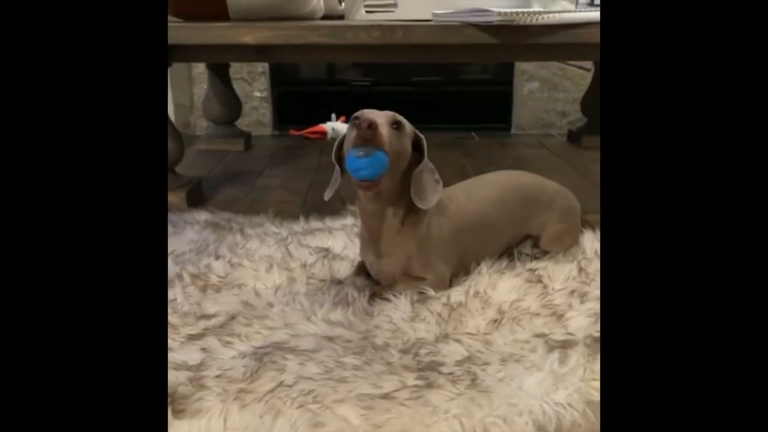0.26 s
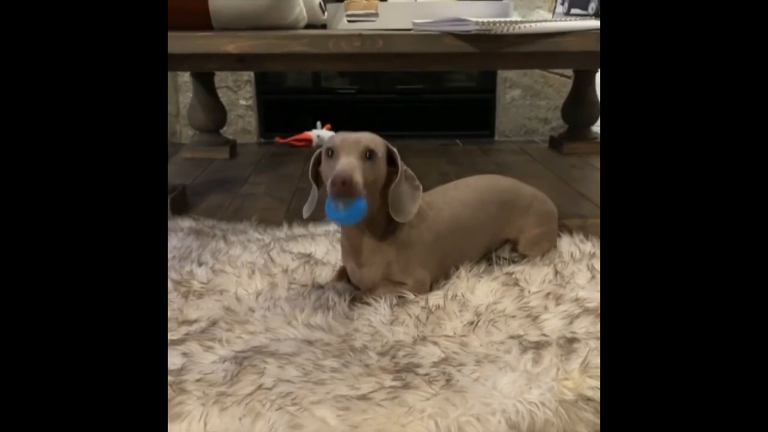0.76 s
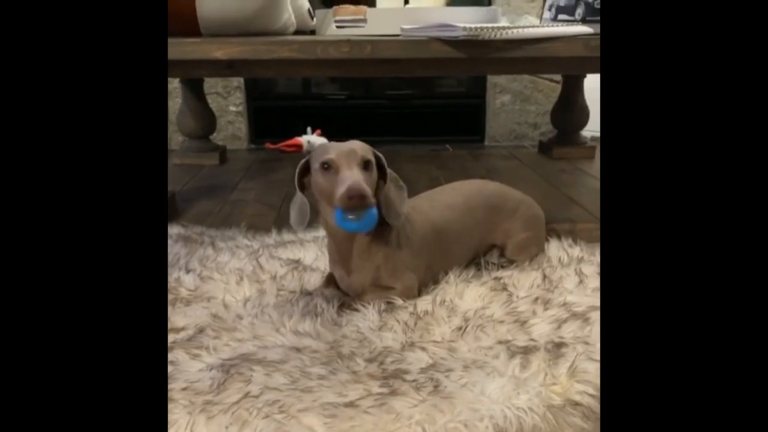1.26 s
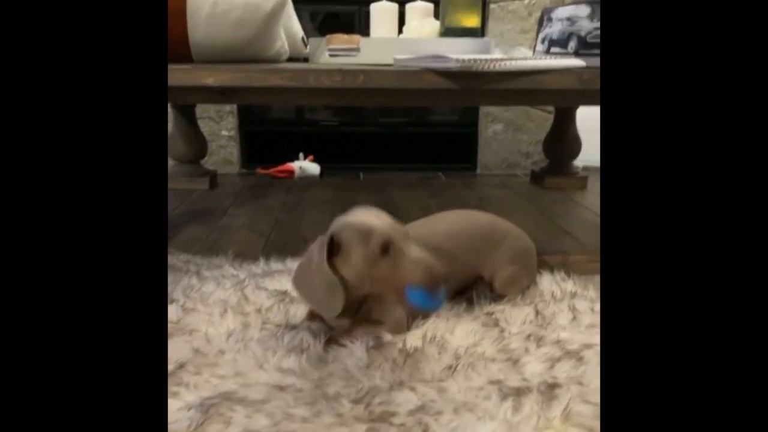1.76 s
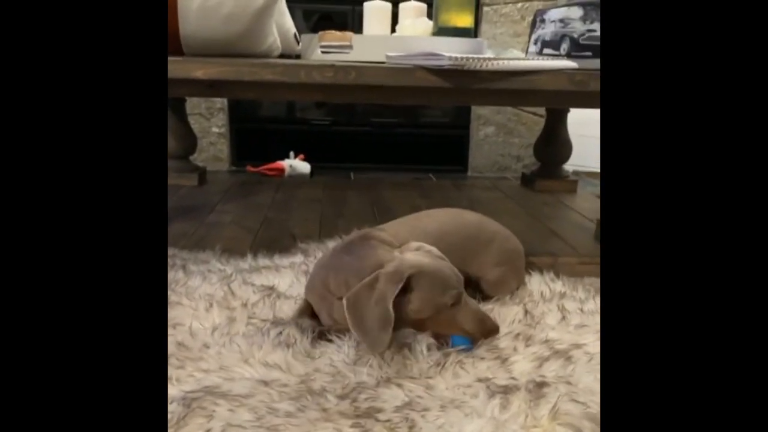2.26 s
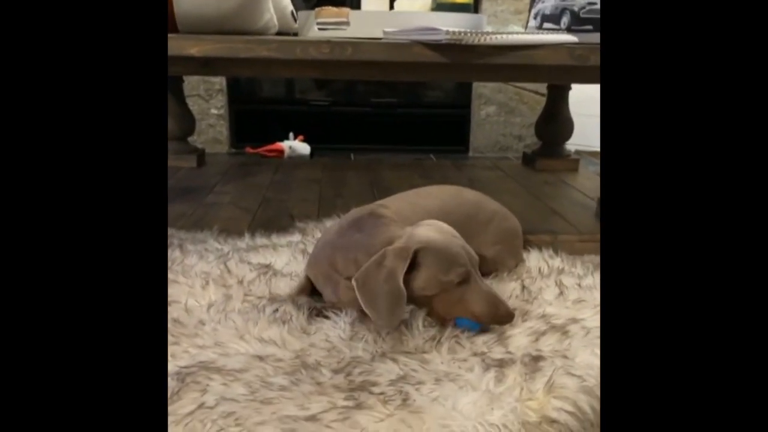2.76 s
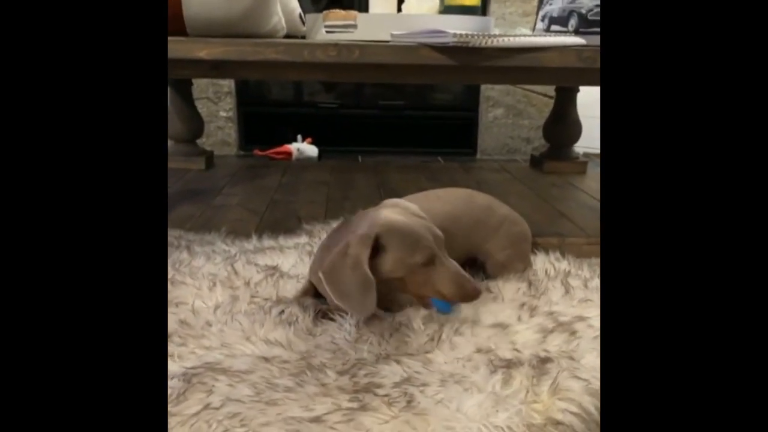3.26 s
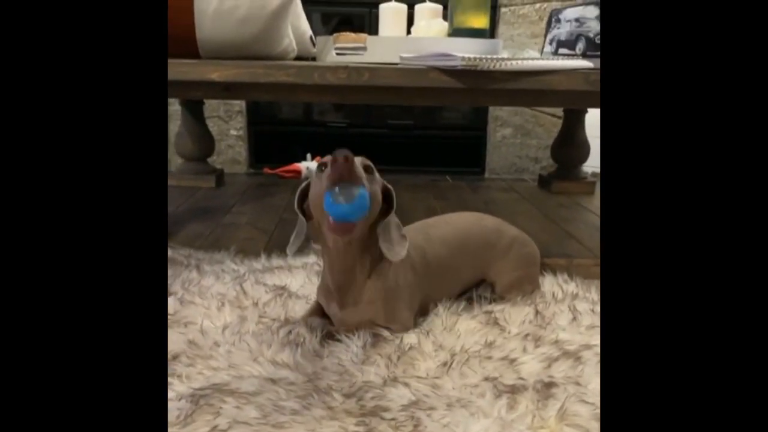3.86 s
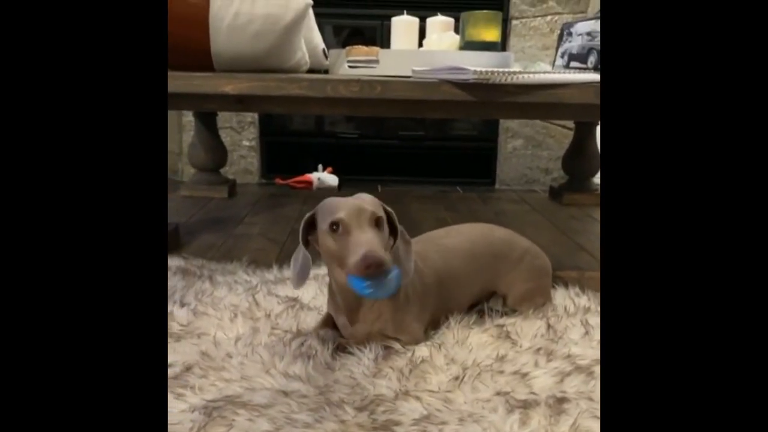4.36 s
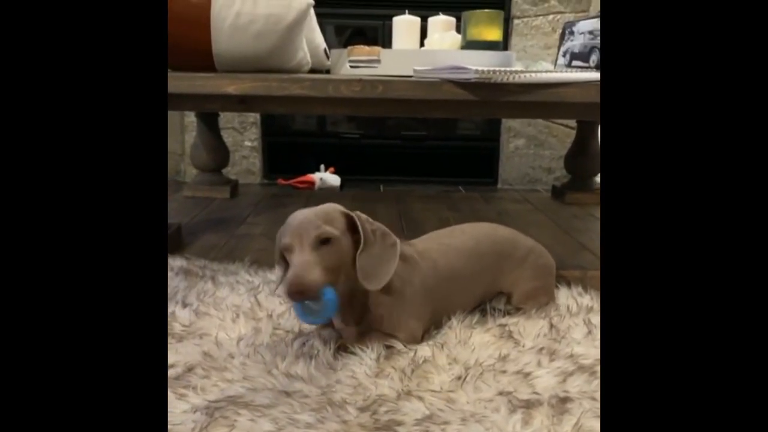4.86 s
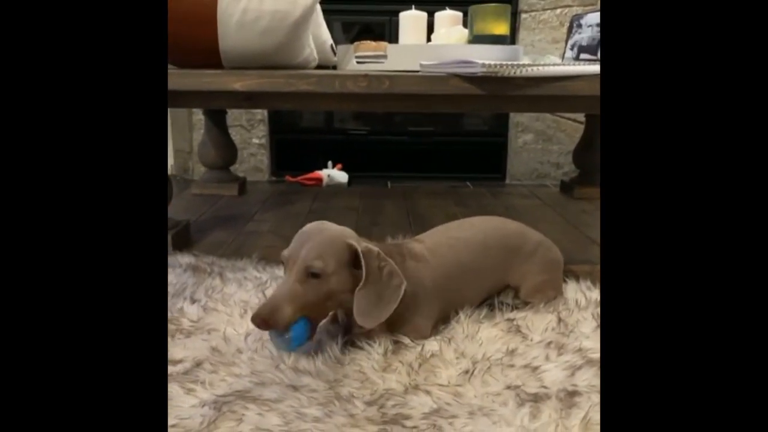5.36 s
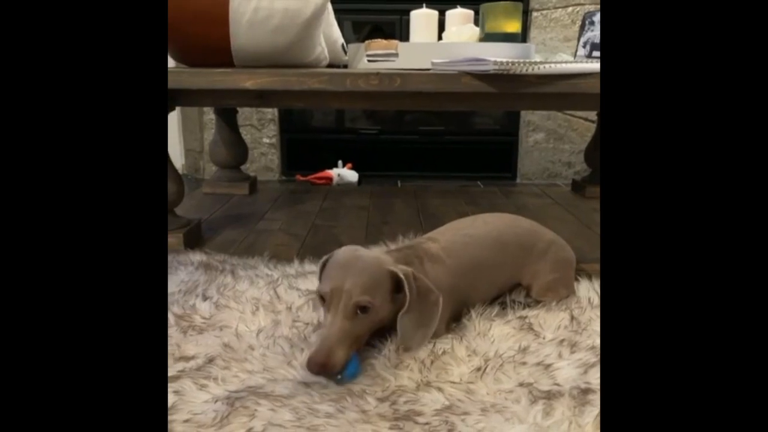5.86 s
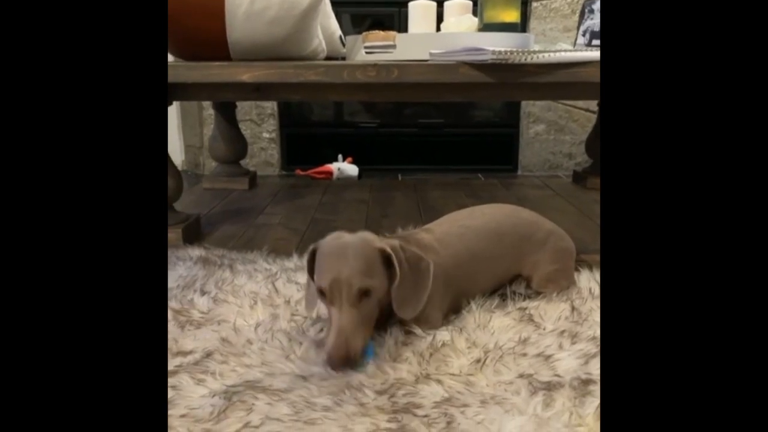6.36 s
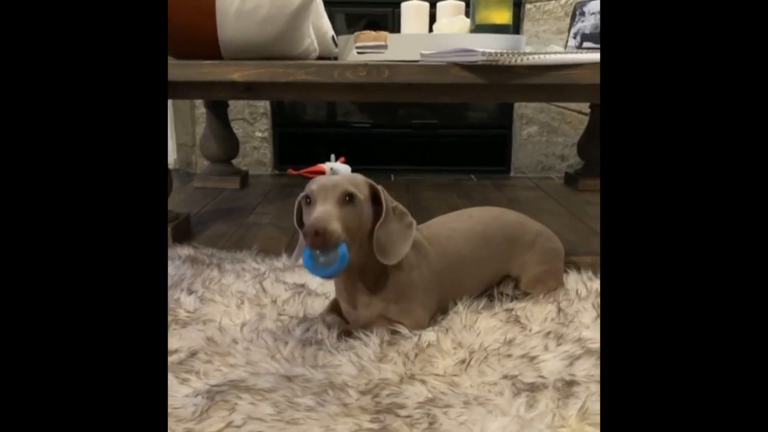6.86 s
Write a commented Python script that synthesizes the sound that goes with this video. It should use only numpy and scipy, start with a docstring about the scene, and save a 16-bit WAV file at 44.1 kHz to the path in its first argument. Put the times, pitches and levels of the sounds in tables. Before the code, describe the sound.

High squeaks from a rubber toy repeat in quick pairs as a dog bites down and lets go. The pitch bends and jumps, with a little rushing air, and each pair trails off lower. The chewing stops briefly halfway, with a few faint ticks of teeth on rubber, then resumes louder and sharper. The microphone is nearby in a quiet living room with a short echo and a soft background rumble.

```python
"""A living room, where a small dog lies on a rug and chews a rubber squeaky toy. Each bite first leaks air,
then drives the toy's reed; the release sucks air back through it as a second squeak. The reed's pitch follows
the air pressure and jumps between registers. A brief grainy rustle with a click opens the scene, teeth tick on
rubber, and the room rings briefly over a low background rumble."""
import sys
import numpy as np
from scipy import signal
from scipy.fft import rfft, irfft, next_fast_len
from scipy.io import wavfile
from scipy.ndimage import uniform_filter1d, map_coordinates

SR = 44100
rng = np.random.default_rng(int(sys.argv[2]) if len(sys.argv) > 2 else 0)


def log_audio(samples):
    """Write samples as a 16-bit WAV file to the path given in sys.argv[1]."""
    # one column per channel
    frames = np.atleast_2d(samples).T
    # limit to full scale, then quantise
    limited = np.clip(frames, -1, 1)
    pcm = np.round(limited * 32767).astype(np.int16)
    wavfile.write(sys.argv[1], SR, pcm)


N = 313551

# one row per bite: leak_start_s, leak_db, fall_per_overtone_db, flutter_depth
BITES = [(.302, -71, 0, 0.0057), (.938, -74.5, -0.5, 0.0084), (1.582, -72.5, 0, 0.014),
         (2.188, -68, 1, 0.012), (2.858, -80.5, 1, 0.02), (4.138, -65.5, 2.5, 0.0099),
         (4.876, -57, -3.5, 0.013), (5.508, -55, -2.5, 0.016), (6.119, -65.5, 1.4, 0.0067),
         (6.84, -60, -1.25, 0.0088)]
# the reed's path under each bite, a list of points: time_s, pitch_hz, level_db
BITE_PATHS = [
    [(.395, 2440, -33), (.414, 2136, -34), (.422, 1730, -32), (.453, 1478, -33.5), (.51, 1554, -33),
     (.53, 1693, -31), (.548, 1441, -33.5), (.574, 1298, -51)],
    [(.999, 1834, -37.5), (1.006, 1520, -28.5), (1.024, 1661, -26), (1.092, 1433, -30), (1.152, 1817, -24),
     (1.157, 2333, -25.5), (1.17, 1966, -30.5), (1.188, 1340, -35)],
    [(1.631, 1652, -36), (1.648, 1609, -31), (1.694, 1401, -34.5), (1.728, 1380, -41.5)],
    [(2.3, 1840, -33.5), (2.321, 1930, -32.5), (2.356, 1780, -41.5)],
    [(2.952, 2916, -32.5), (2.97, 2816, -33), (2.984, 2844, -29), (2.985, 2605, -32), (3.01, 2634, -34.5),
     (3.033, 2530, -27.5), (3.05, 2660, -29), (3.07, 2768, -38.5), (3.099, 2620, -43)],
    [(4.259, 2507, -27.5), (4.284, 2652, -26), (4.312, 3446, -15), (4.313, 4440, -17.5), (4.331, 5316, -28),
     (4.35, 5385, -21.5), (4.371, 4250, -22), (4.372, 2678, -21), (4.39, 2048, -33), (4.399, 1447, -46)],
    [(4.988, 2662, -21.5), (5.018, 2680, -26), (5.03, 3050, -17), (5.041, 3410, -18), (5.042, 4600, -17),
     (5.056, 5594, -20.5), (5.066, 5670, -17.5), (5.082, 5310, -29.5), (5.095, 4120, -28),
     (5.096, 2470, -30), (5.108, 1745, -34.5)],
    [(5.597, 2844, -24), (5.604, 2800, -19.5), (5.613, 2477, -18.5), (5.635, 2716, -21),
     (5.65, 2891, -17.5), (5.676, 2924, -19), (5.695, 2273, -25), (5.713, 1450, -34.5)],
    [(6.22, 2475, -31.5), (6.235, 2465, -27.5), (6.259, 1937, -28.5), (6.295, 1440, -29.5),
     (6.336, 1801, -27.5), (6.345, 2238, -22.5), (6.369, 1360, -38)],
    [(6.967, 2326, -25), (6.989, 2205, -25), (7.003, 1698, -26.5), (7.032, 1343, -32), (7.045, 1413, -28),
     (7.06, 1612, -20.5), (7.076, 1454, -31.5), (7.087, 1503, -48)],
]
# colour of the toy's escaping air: frequency_hz, level_db
AIR_COLOUR = [(880, -26.5), (1500, -13), (2440, -10), (4520, -0.5), (7140, -14.5), (8940, -3.5),
              (14000, -15)]
TREBLE_HZ, TOP_HZ = 7130, 14100  # the jaws shade the band between these
SLIP_S, STOP_S, FADE_S = .0027, .0013, .028  # ramps: a pitch slip, a cut-off, a soft fade


def reed():
    """The toy's reed: air pressure bends its pitch, and it falters at each jump of register."""
    # a high note slips briefly in pitch or level: start_s, end_s, pitch_ratio, change_db
    slips = [(.701, .72, 0.92, 9), (0.729, .746, 1, -9.5), (1.32, 1.363, .89, 4.5),
             (5.861, 5.883, .81, 4.5)]
    t = np.arange(N) / SR
    paths, attacks, fall_db, flutter = zip(*squeaks())
    times, hz, db = np.concatenate(paths).T
    which = np.maximum(np.searchsorted([path[0][0] for path in paths], t) - 1, 0)  # current squeak
    note_hz = np.exp(np.interp(t, times, np.log(hz)))
    level_db = np.interp(t, times, db)
    for start, end, ratio, change_db in slips:
        slipping = window(start - SLIP_S / 2, end + SLIP_S / 2, SLIP_S, SLIP_S)
        note_hz *= ratio ** slipping
        level_db += change_db * slipping
    for jump_s in times[1:][np.diff(times) < .002]:  # points this close are a jump of register
        level_db -= 17.5 * np.exp(-((t - jump_s) / .0011) ** 2)
    gate = sum(window(path[0][0], path[-1][0], rise, STOP_S) for path, rise in zip(paths, attacks))
    # fast turns of pressure, and so of pitch, shake the reed and let air rush past
    bend_rate = np.abs(np.gradient(np.log(note_hz))) * SR
    glide = uniform_filter1d(np.minimum(bend_rate, 25), size=SR // 50)
    shake = np.array(flutter)[which] * (.6 + .054 * glide)
    pitch_hz = note_hz * (1 + shake * (.296 * wobble(150) + .84 * wobble(600)))
    # treble that gets past the jaws, per chew: bite_db, release_db
    jaw_treble = [(-1.5, -2), (-2, -2), (-7, 2), (-5, -1), (-2, 5.5), (2, 1), (-6.5, 4), (-4.5, 6), (5, 4),
                  (-3, 2.5)]
    treble_db = np.ravel(jaw_treble)[which]
    tone = shell_tone(note_hz, pitch_hz, np.array(fall_db)[which], treble_db)
    return amp(level_db) * gate * (tone + rasp(note_hz, glide, which, treble_db))


def squeaks():
    """Bites snap the reed open, releases draw it in gently: (path, attack_s, fall_db, flutter) each."""
    # one row per release: catch_s, dropped_s, stop_s, low_db, last_hz, fall_per_overtone_db, flutter_depth
    releases = [(0.593, .851, 0.89, -39, 1071, 3.2, 0.0092), (1.207, 1.468, 1.521, -43, 1029, 4.9, .014),
                (1.743, 1.839, 1.874, -41, 1099, 3.07, 0.021), (2.364, 2.548, 2.62, -47, 1077, 5, .02),
                (3.147, 3.271, 3.334, -36, 1090, 3.26, 0.016), (4.413, 4.558, 4.649, -33, 1080, 2.6, 0.012),
                (5.12, 5.306, 5.326, -40, 1072, 2.76, 0.01), (5.726, 5.939, 5.947, -35, 1020, 4.3, .016),
                (6.389, 6.523, 6.578, -30.5, 1101, 1.59, .012), (7.088, 7.16, 7.22, -33, 1095, 2.64, .015)]
    # the reed's path as the toy refills, from catch to drop: time_s, pitch_hz, level_db
    refill_paths = [
        [(.602, 2545, -32.5), (.619, 2598, -29.5), (.62, 2950, -21), (.63, 3410, -24.5), (.636, 4366, -31),
         (.685, 4220, -35.5), (.704, 4136, -47.5), (.745, 4115, -36.5), (.766, 4450, -26.5), (.773, 4800, -46),
         (.79, 4455, -32), (.809, 4055, -35), (.812, 3446, -26.5)],
        [(1.215, 2530, -32), (1.226, 2574, -27.5), (1.227, 2950, -22.5), (1.242, 3380, -23), (1.249, 4400, -27),
         (1.29, 4290, -33), (1.316, 4045, -32.5), (1.362, 4107, -36), (1.378, 4450, -33.5),
         (1.393, 4760, -46.5), (1.424, 4024, -24)],
        [(1.745, 1266, -39), (1.785, 1417, -39), (1.797, 1730, -35.5), (1.804, 2437, -30.5),
         (1.815, 2460, -33.5), (1.829, 1590, -37.5)],
        [(2.374, 1553, -38.5), (2.384, 2444, -30), (2.397, 2700, -35.5), (2.446, 2837, -34),
         (2.455, 3420, -27.5), (2.471, 4985, -40.5), (2.487, 4885, -36.5), (2.51, 3830, -30),
         (2.536, 1576, -36.5)],
        [(3.15, 1760, -33.5), (3.161, 2140, -33), (3.185, 2390, -29.5), (3.199, 1815, -34),
         (3.214, 1560, -35.5), (3.256, 1638, -35.5)],
        [(4.425, 2647, -29.5), (4.445, 2390, -26.5), (4.47, 2690, -27), (4.499, 2606, -29),
         (4.517, 2145, -28.5), (4.531, 1666, -28)],
        [(5.127, 2346, -30), (5.152, 2440, -33.5), (5.162, 2742, -32), (5.203, 2707, -32.5), (5.229, 2142, -31),
         (5.238, 1620, -33.5), (5.257, 1342, -37.5), (5.276, 1250, -38), (5.291, 1457, -33.5)],
        [(5.739, 2372, -30), (5.766, 2477, -29.5), (5.775, 2730, -28.5), (5.79, 3205, -25),
         (5.798, 4132, -27.5), (5.83, 4210, -24), (5.858, 3960, -29.5), (5.887, 4148, -27), (5.902, 4025, -33),
         (5.906, 3153, -27.5), (5.928, 1550, -33)],
        [(6.394, 1493, -27), (6.399, 2308, -25), (6.409, 2385, -24.5), (6.41, 2787, -31), (6.422, 2582, -27),
         (6.44, 2747, -26.5), (6.464, 2798, -31), (6.488, 2010, -25.5), (6.492, 1628, -31.5)],
        [(7.096, 1262, -29.5), (7.102, 1653, -24), (7.111, 2405, -22.5)],
    ]
    snap_s, draw_s = .0007, .0016
    catch_hz, dropped_hz = 1354, 1248  # a release starts low and drops back low
    sag_hz_per_s, sag_db_per_s = 590, 48.5  # its ending sinks and weakens
    out = []
    for bite, bite_path, release, refill in zip(BITES, BITE_PATHS, releases, refill_paths):
        catch_s, dropped_s, stop_s, low_db, last_hz, *timbre = release
        fading_s = max(stop_s - FADE_S, dropped_s + SLIP_S)
        sagged_hz = dropped_hz - sag_hz_per_s * (fading_s - dropped_s)
        sagged_db = low_db - sag_db_per_s * (stop_s - dropped_s)
        release_path = [(catch_s, catch_hz, refill[0][2]), *refill, (dropped_s, dropped_hz, low_db),
                        (fading_s, sagged_hz, sagged_db), (stop_s, last_hz, sagged_db - 7.5)]
        out += [(bite_path, snap_s, *bite[2:]), (release_path, draw_s, *timbre)]
    return out


def shell_tone(note_hz, pitch_hz, fall_db, treble_db):
    """The reed's flickering overtones, coloured by the toy's pipe and rubber shell."""
    # resonance of pipe and shell: frequency_hz, gain_db
    shell = [(900, -10), (1300, -3), (2500, 1.5), (3600, 7.5), (4500, 7), (5700, -2.5), (6800, -9),
             (8500, -8), (10500, -6), (12000, -30), (14000, -13.5)]
    # the reed skips every other beat, adding half-pitch partials: start_s, end_s, level_db
    skips = [(0.603, 0.617, 1), (1.216, 1.227, 0.5), (4.432, 4.468, -7), (5.152, 5.186, -9),
             (5.717, 5.774, -11), (6.4, 6.419, -6)]
    skipping = sum(amp(db) * window(start, end, .004, .0031) for start, end, db in skips)
    phase = 2 * np.pi * np.cumsum(pitch_hz) / SR
    tone, power = np.zeros(N), np.zeros(N)
    for k in np.arange(2, 25) / 2:
        hz = k * note_hz
        tilt_db = fall_db * min(k, 4.46)  # the tilt levels off for high overtones
        gain = amp(along(shell, hz) - tilt_db + treble_db * (hz > TREBLE_HZ))
        gain *= np.clip((TOP_HZ - hz) / 500 + 1, 0, 1)
        if k in (1, 2, 3):  # these harmonics set the loudness
            power += gain ** 2 / 2
        if k % 1:
            gain *= skipping
        tone += gain * amp(2.57 * wobble(90)) * np.sin(k * phase)
    return tone / np.sqrt(power)


def rasp(note_hz, glide, which, treble_db):
    """Turbulent air rushes past the reed: rough on glides, purer on held notes."""
    # base level of the air against the tone, per chew: bite_db, release_db
    breathiness = [(-24.5, -30.5), (-27, -32), (-14, -26.5), (-20, -26.5), (-42, -26.5), (-37, -22.5),
                   (-31.5, -30), (-29, -31), (-25, -26), (-22.5, -28.5)]
    top_register = note_hz > 3716  # whistles with less air
    level = amp(np.ravel(breathiness)[which] - 9 * top_register + 1.5 * wobble(60))
    rush = hiss(AIR_COLOUR)
    bright = filtered(rush, lambda hz: hz > TREBLE_HZ)
    body = (1 + .23 * glide) * (rush - bright)
    sizzle = (1 + .12 * glide) * amp(treble_db + 5) * bright
    return level * (body + sizzle)


def second_note():
    """For moments, the reed's other note sounds along with its high whistle."""
    # start_s, end_s, pitch_hz, level_db
    notes = [(0.692, .748, 4100, -44.5), (0.763, 0.792, 3730, -45.5), (1.351, 1.424, 3603, -47),
             (4.315, 4.32, 3444, -24), (5.038, 5.043, 3410, -27)]
    t = np.arange(N) / SR
    tone = sum(amp(db) * window(start, end, SLIP_S, SLIP_S) * np.sin(2 * np.pi * hz * t)
               for start, end, hz, db in notes)
    return np.sqrt(2) * amp(1.5 * wobble(120)) * tone


def leaks():
    """The jaw squeezes air out before the reed starts."""
    level = sum(amp(db) * window(start, path[0][0], .07, .008)
                for (start, db, *_), path in zip(BITES, BITE_PATHS))
    return level * hiss(AIR_COLOUR)


def teeth():
    """Tiny noise bursts, each around its own pitch: a click inside the opening rustle, then teeth and tongue
    ticking on rubber."""
    # start_s, relative_db, centre_hz
    ticks = [(0.162, -42, 6340), (3.699, -50, 9800), (3.7365, -47.5, 4340), (3.925, -45.5, 3840)]
    out, t = np.zeros(N + SR), np.arange(SR // 50) / SR
    for start, db, hz in ticks:
        body = uniform_filter1d(rng.standard_normal(len(t)), size=8) * np.sin(2 * np.pi * hz * t)
        click = np.diff(rng.standard_normal(len(t) + 1))
        decay = amp(db + 4.5 - 60 * t / .0088)
        out[round(start * SR):][:len(t)] += decay * (1.3 * body + .18 * click)
    return out[:N]


def room(x):
    """Floor and furniture answer fast; each squeak then rings with its own random echo tail."""
    # decay of the diffuse tail: frequency_hz, t60_s
    ring_times = [(1000, 0.53), (2600, 0.4), (7000, 0.29), (13000, 0.23)]
    # colour of the echoes: frequency_hz, gain_db
    colour = [(1200, -3), (3700, 0.5), (6000, -4.5), (13000, -3)]
    # echoes against the direct sound, per chew: level_db
    sends = [-8.5, -7, -4.5, -3.5, -4, -6.5, -7.5, -8.5, -6, -6.5]
    edges = [0, *(round(path[0][0] * SR) for path, *_ in squeaks()[1:]), N]
    out = np.zeros(N + SR)
    for start, end, send_db in zip(edges, edges[1:], np.repeat(sends, 2)):
        hz, t, noise = signal.stft(rng.standard_normal(SR // 2), SR, nperseg=256)
        early = amp(5 - 60 * t / .11)
        diffuse = amp(-60 * t / along(ring_times, hz)[:, None])
        tail = signal.istft(noise * (early + diffuse) * amp(along(colour, hz))[:, None], SR, nperseg=256)[1]
        delayed = np.pad(x[start:end], (180, 0))
        echo = signal.fftconvolve(delayed, tail / np.linalg.norm(tail))
        out[start:start + len(echo)] += amp(send_db) * echo
    return out[:N]


def rustle():
    """A brief grainy rustle at the very start."""
    # swell of the rustle: time_s, relative_db
    swell = [(0.07, -75), (0.08, -55.5), (0.19, -78)]
    # its colour: frequency_hz, level_db
    fibres = [(59, -33), (100, 5), (462, -26), (933, -23.5), (2130, -15.5), (14000, -41.5)]
    times, db = np.transpose(swell)
    grain = amp(np.interp(np.arange(N) / SR, times, db) + 7.5 + 1.9 * wobble(142))
    return grain * window(times[0], times[-1], .0035, .013) * hiss(fibres)


def faint_whistle():
    """A thin, very high sine glides upward after one release."""
    # time_s, pitch_hz
    rise = [(3.46, 12000), (3.53, 12600), (3.63, 13900)]
    times, hz = np.transpose(rise)
    phase = 2 * np.pi * np.cumsum(np.interp(np.arange(N) / SR, times, hz)) / SR
    return amp(-83 + 2 * wobble(60)) * window(times[0], times[-1], FADE_S, STOP_S) * np.sin(phase)


def rumble():
    """Low background rumble that slowly swells, then ducks at the loudest squeaks."""
    # envelope of the rumble: time_s, level_db
    envelope = [(0, -61), (.2, -66.5), (.6, -59.5), (3.599, -52.5), (5, -50.5), (5.051, -57.5),
                (5.598, -56), (7.11, -53.5)]
    # its colour: frequency_hz, level_db
    colour = [(25, -12.5), (65, -0.5), (107, -0.5), (335, -16), (802, -21), (1260, -27), (2310, -38),
              (3530, -37.5), (14000, -58.5)]
    times, db = np.transpose(envelope)
    return amp(np.interp(np.arange(N) / SR, times, db) + 1.4 * wobble(2.5)) * hiss(colour)


def amp(db):
    """Decibels to gain."""
    return 10 ** (np.asarray(db) / 20)


def along(points, hz):
    """(frequency_hz, value) points read on a log axis."""
    freqs, values = np.transpose(points)
    return np.interp(np.log(hz + 1), np.log(freqs + 1), values)


def wobble(rate):
    """A smooth random curve, rate knots a second."""
    return map_coordinates(rng.standard_normal(int(N * rate / SR) + 4), [np.arange(N) * rate / SR])


def filtered(x, response):
    """x shaped by a frequency response."""
    size = next_fast_len(N + SR // 2)
    return irfft(rfft(x, size) * response(np.fft.rfftfreq(size, 1 / SR)), size)[..., :N]


def hiss(colour):
    """Coloured noise of rms 1."""
    noise = filtered(rng.standard_normal(N), lambda hz: amp(along(colour, hz)))
    return noise / np.sqrt(np.mean(noise ** 2) + 1e-20)


def window(start, end, rise, fall):
    """A gate that opens at start and shuts at end."""
    t = np.arange(N) / SR
    return np.clip(np.minimum((t - start) / rise, (end - t) / fall), 0, 1)


def scene():
    """The chewed toy in the room, over the rumble, in mono."""
    toy = reed() + second_note() + leaks() + teeth()
    return (toy + room(toy) + faint_whistle() + rustle() + rumble())[None]


def record(dry):
    """The overall sound has little deep bass, two narrow treble dips and no extreme highs."""
    # centre_hz, width_hz, gain_db
    treble_dips = [(6670, 650, -6.5), (11970, 360, -11)]

    def response(hz):
        dip_db = sum(db * np.exp(-((hz - centre) / width) ** 2) for centre, width, db in treble_dips)
        low_cut = hz ** 4 / (hz ** 4 + 36 ** 4)
        return amp(dip_db) * low_cut / (1 + (hz / TOP_HZ) ** 500)
    return filtered(dry, response)


dry = scene()
out = record(dry)
log_audio(out)
```